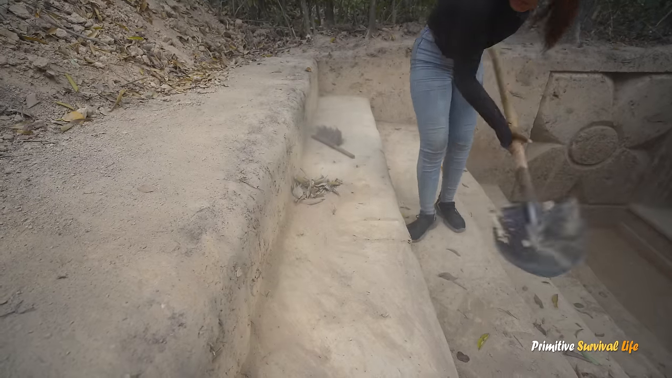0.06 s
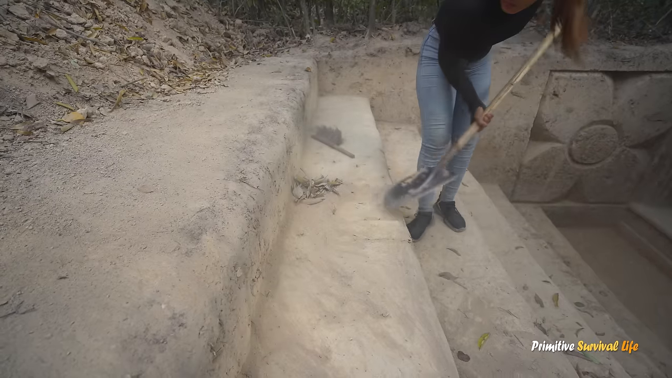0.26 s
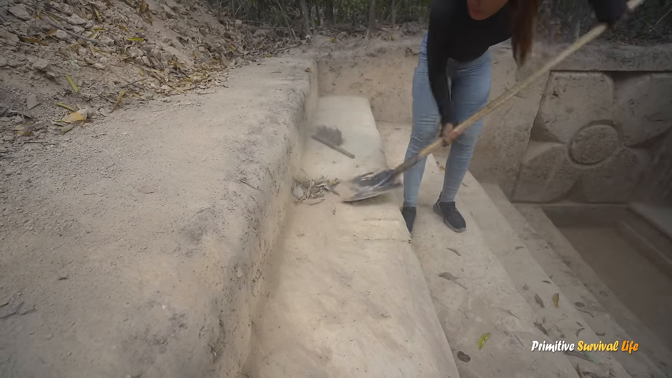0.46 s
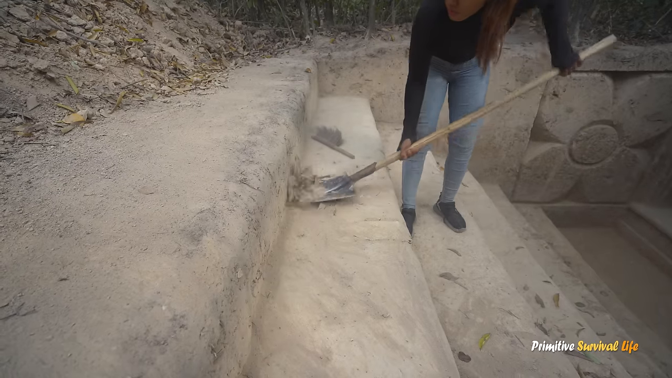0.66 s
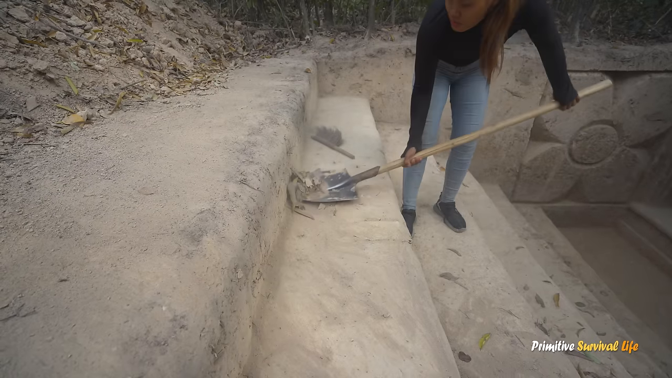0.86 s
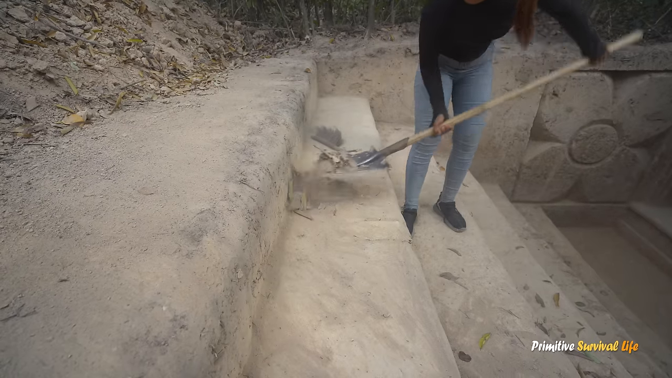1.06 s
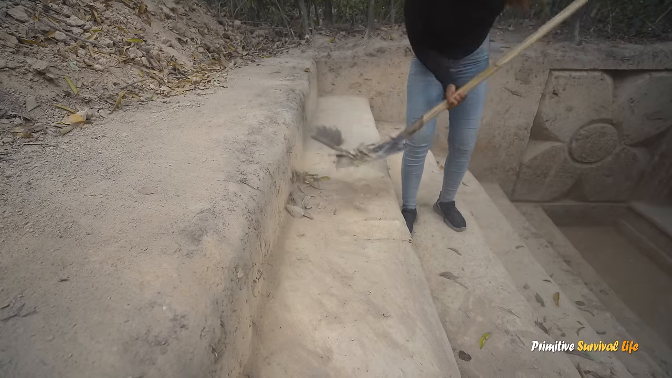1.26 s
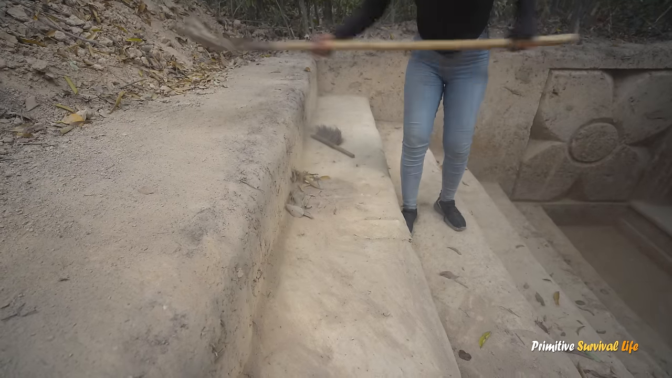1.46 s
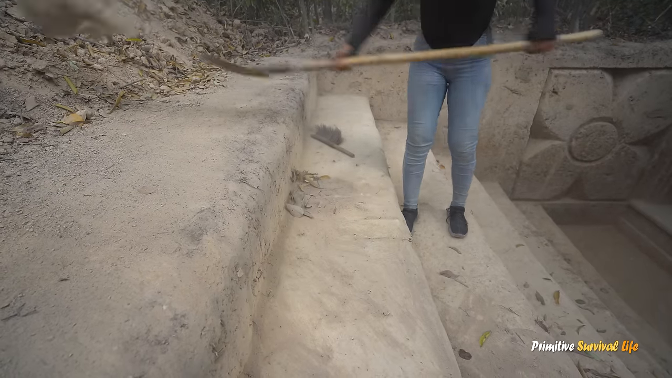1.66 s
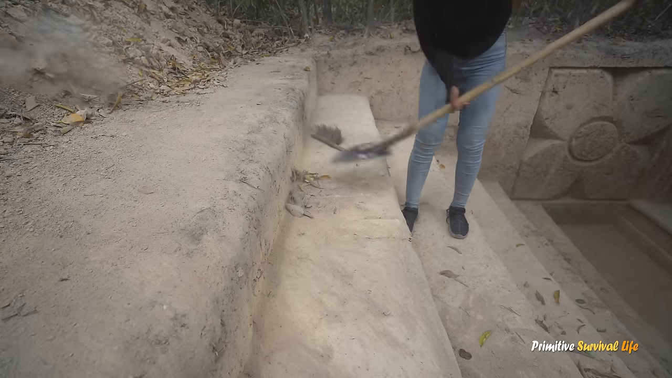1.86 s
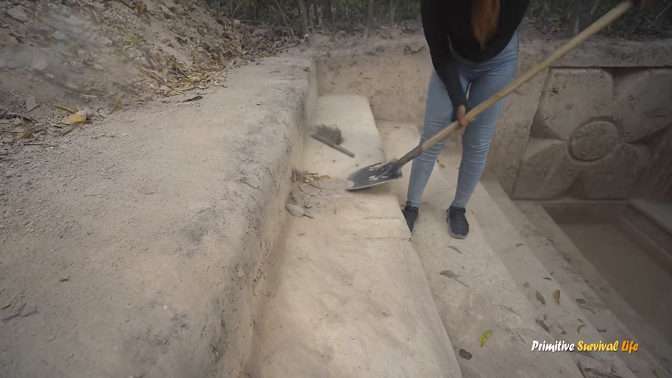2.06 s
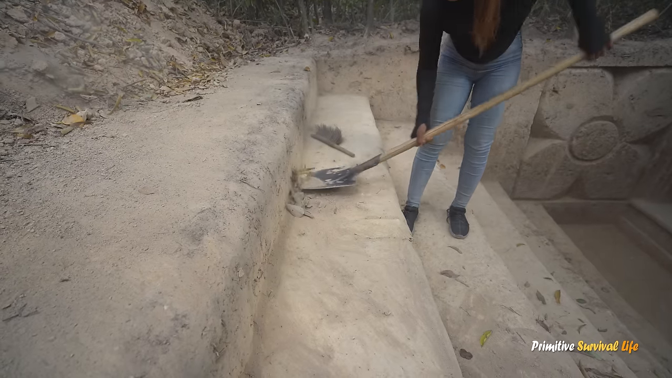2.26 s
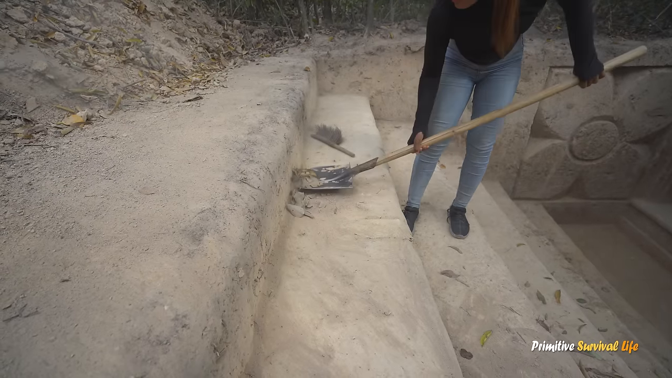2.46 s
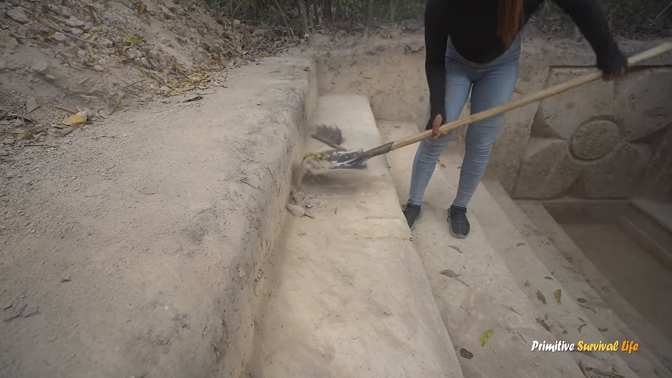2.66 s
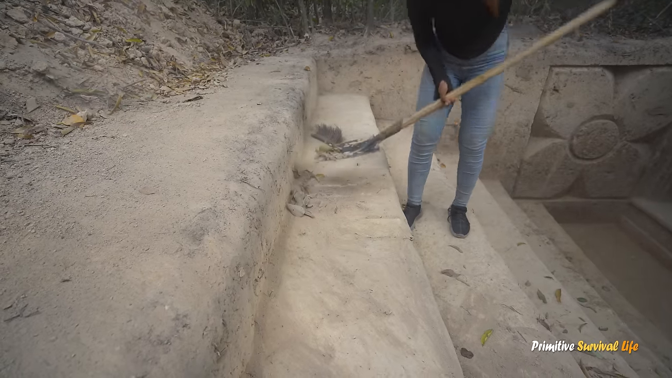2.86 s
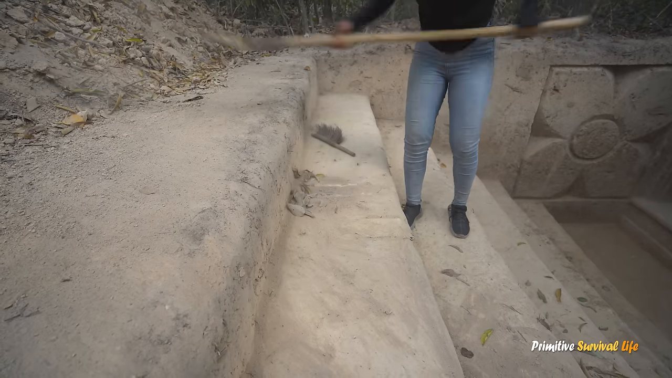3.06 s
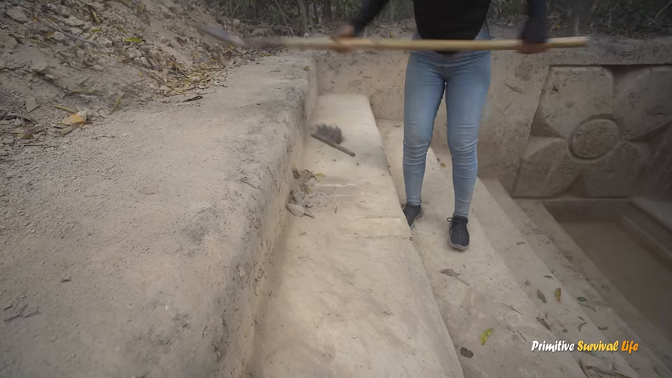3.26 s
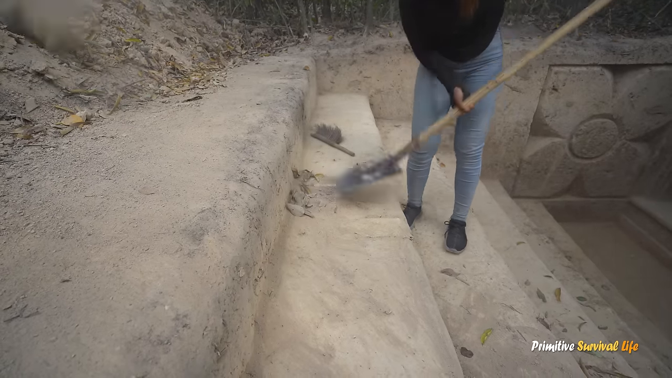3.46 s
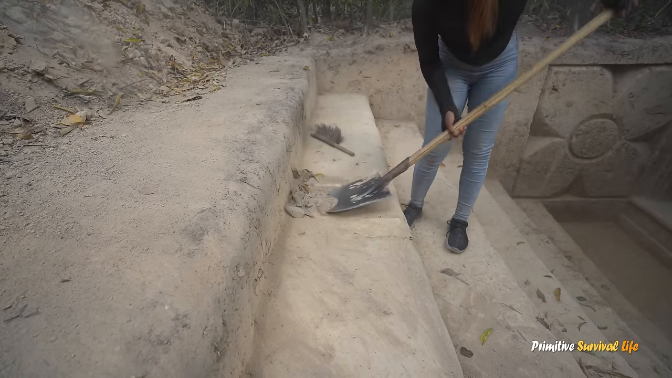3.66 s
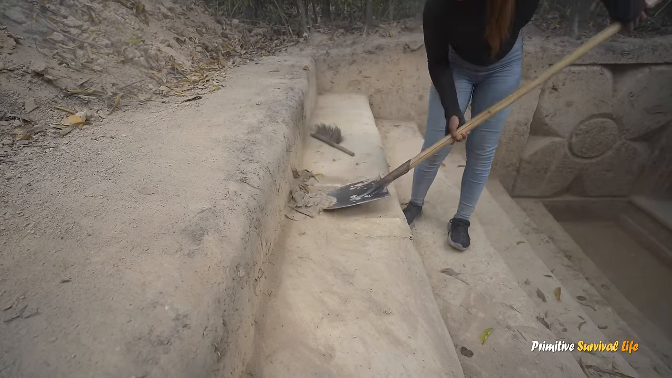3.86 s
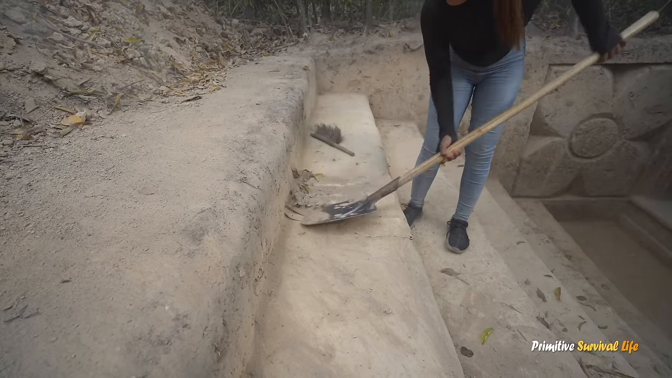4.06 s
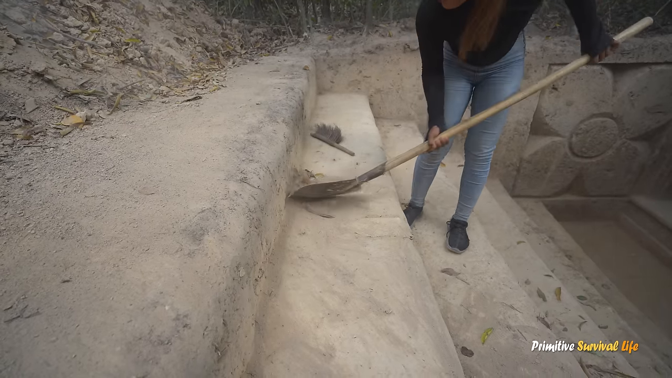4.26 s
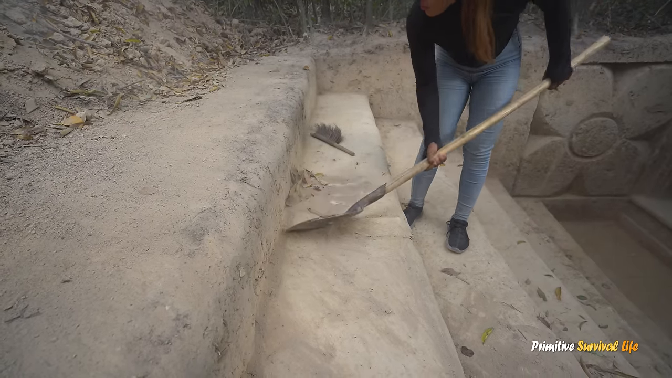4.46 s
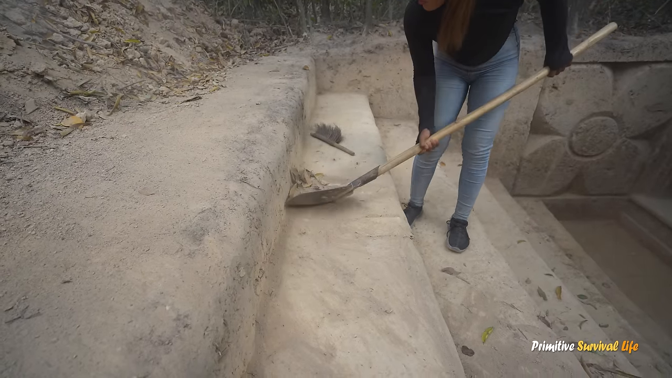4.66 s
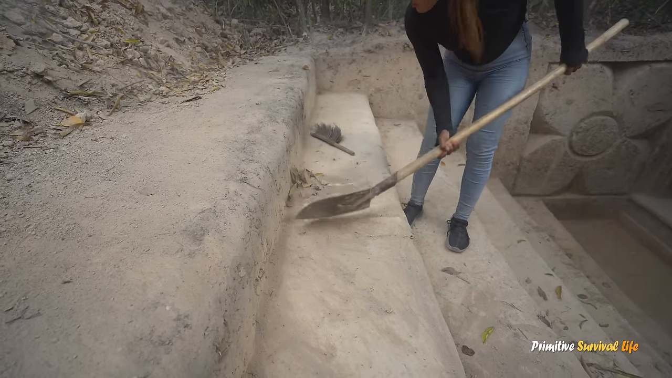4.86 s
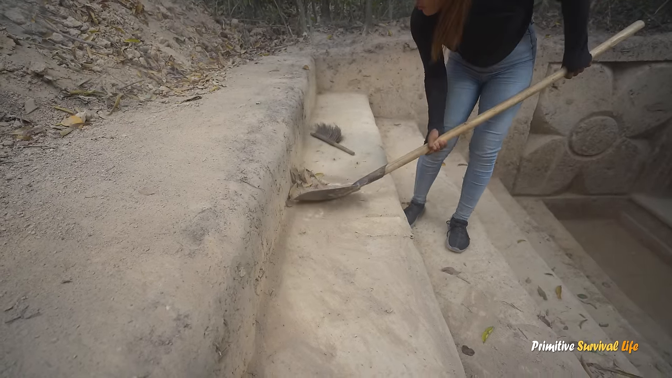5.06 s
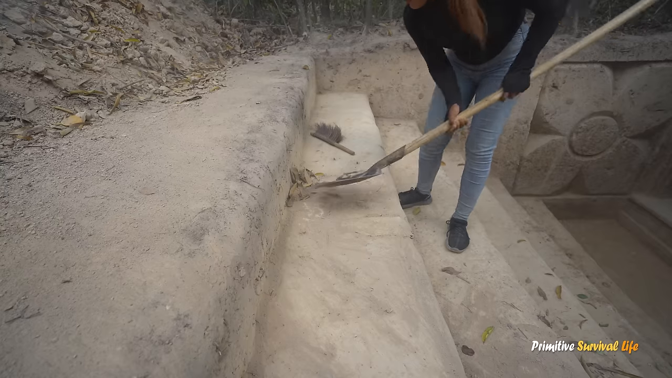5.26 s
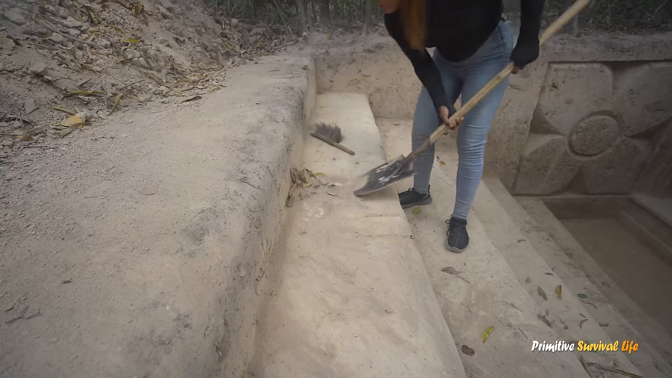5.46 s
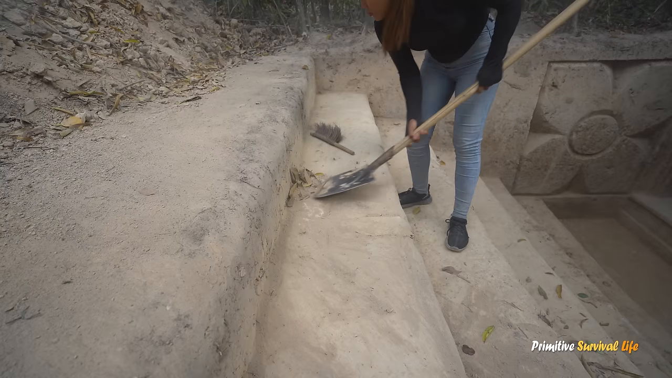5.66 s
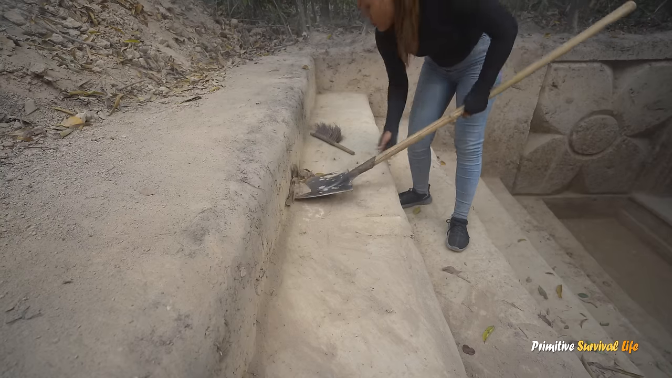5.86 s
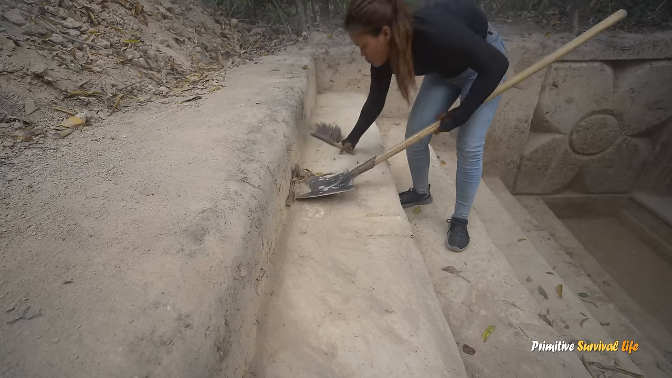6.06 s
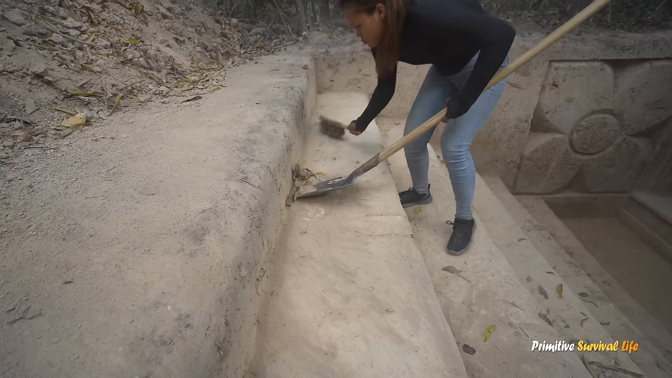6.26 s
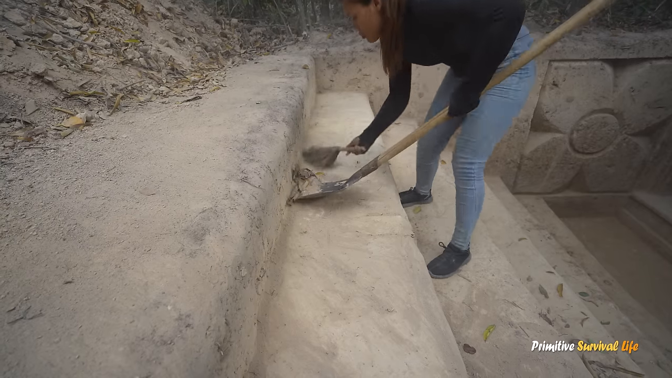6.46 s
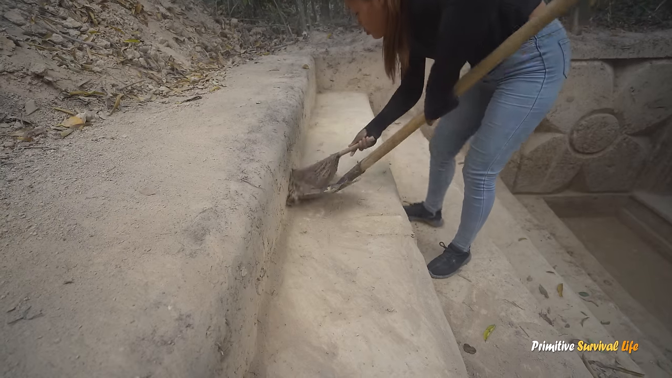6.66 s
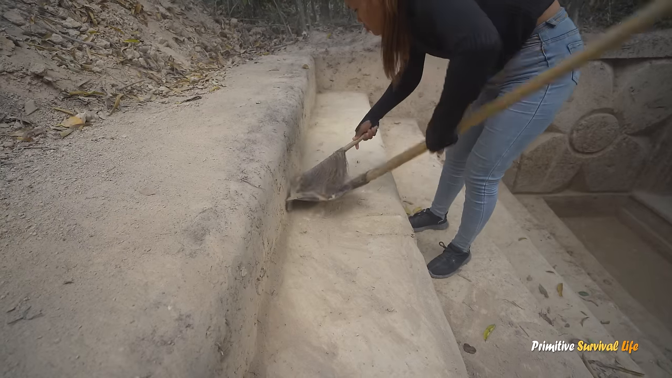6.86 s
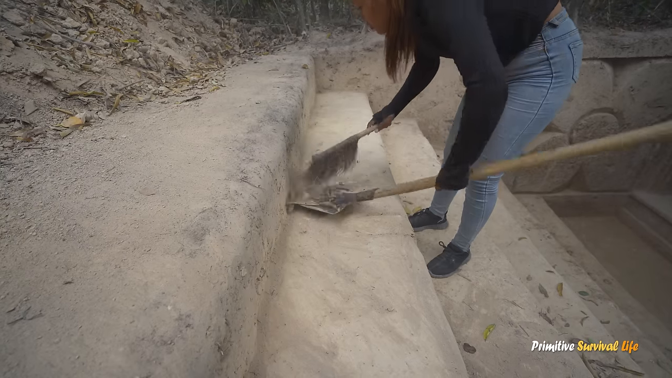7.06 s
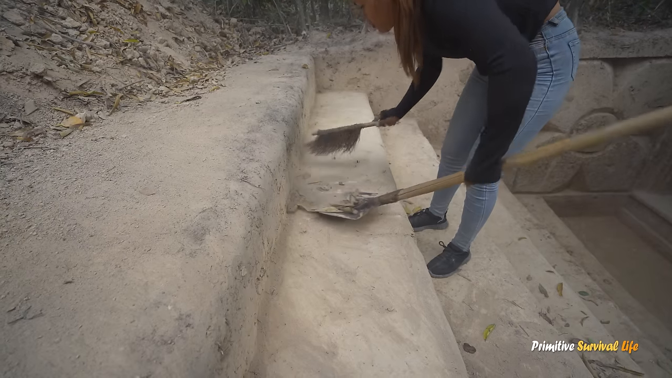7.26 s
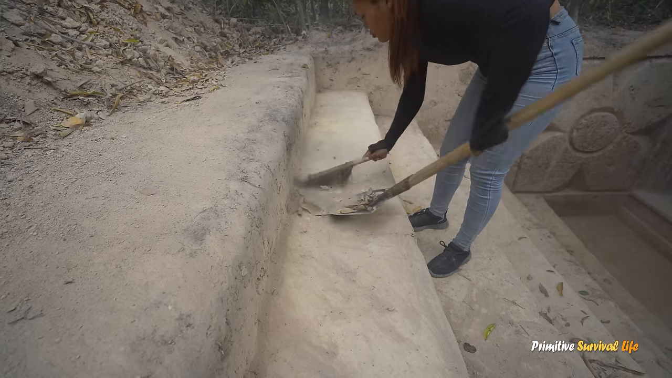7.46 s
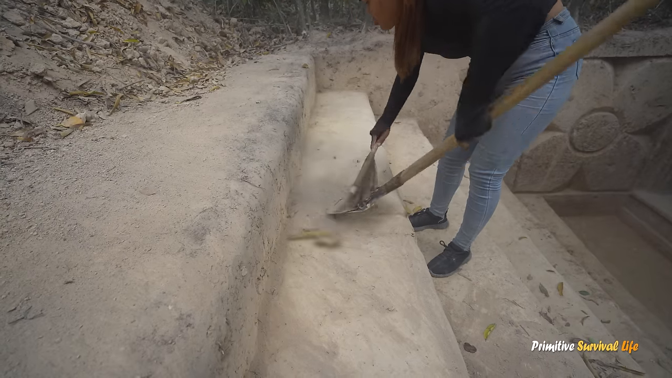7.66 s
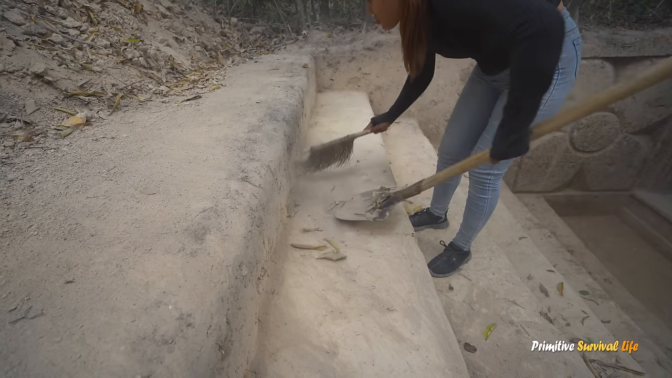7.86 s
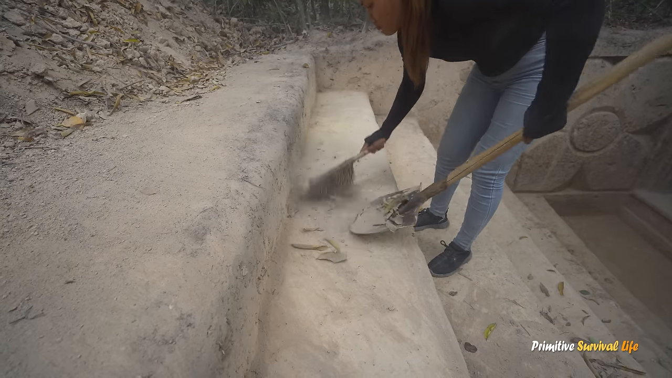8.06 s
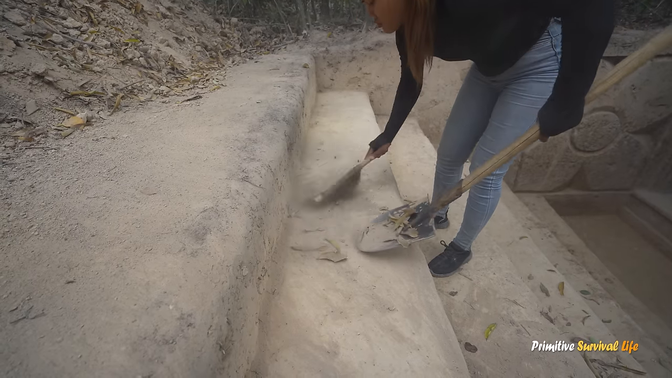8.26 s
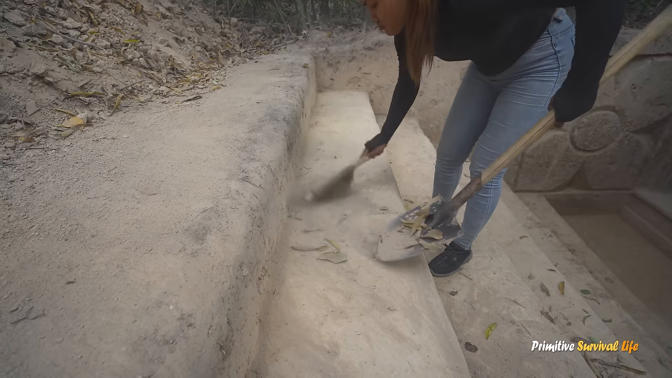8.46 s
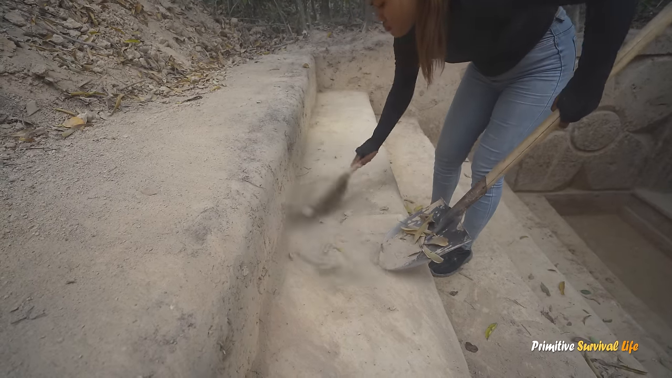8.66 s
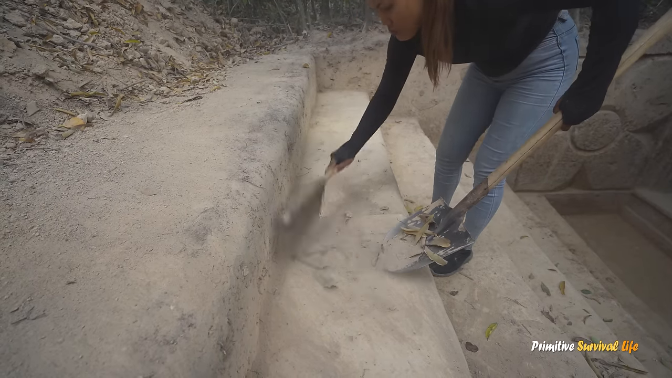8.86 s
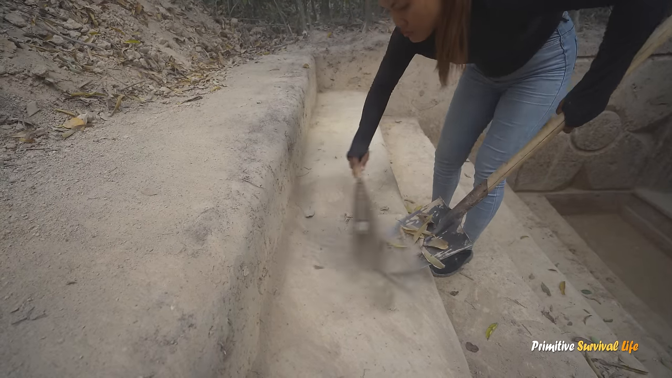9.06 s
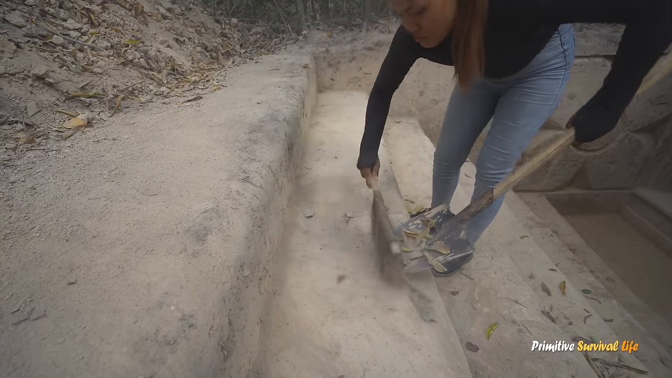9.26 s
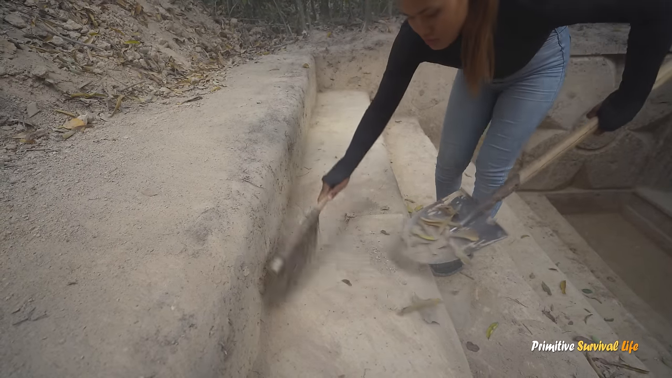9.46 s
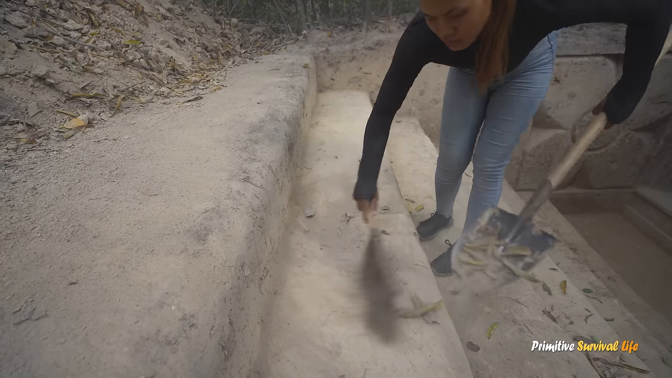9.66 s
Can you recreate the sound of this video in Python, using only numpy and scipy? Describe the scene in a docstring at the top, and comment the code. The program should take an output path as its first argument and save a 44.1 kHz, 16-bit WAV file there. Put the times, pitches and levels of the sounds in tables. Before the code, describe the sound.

A steel shovel scrapes and knocks on dry earth outdoors, then a hand brush sweeps grit and leaves onto the blade.

```python
"""Loose dirt slides in quiet forest air, then a steel shovel scrapes and knocks on dry earthen steps.
It throws its load aside, and a hand brush sweeps leaves onto the blade. Streams of tiny impacts make
grit hiss and leaves rustle; rubbing and blows ring the blade and handle at their modes while the
packed earth rumbles underneath. Clods and twigs snap. All is heard from a couple of metres away."""
import sys
import numpy as np
from scipy import signal
from scipy.fft import rfft, irfft, next_fast_len
from scipy.io import wavfile
from scipy.ndimage import uniform_filter1d

SR = 44100
rng = np.random.default_rng(int(sys.argv[2]) if len(sys.argv) > 2 else 0)


def unload_audio(sound):
    """Save the sound as a 16-bit wav file, at the path given as the first command line argument."""
    columns = np.transpose(np.atleast_2d(sound))
    # keep every value between -1 and 1, then stretch to whole-number steps
    steps = np.round(np.clip(columns, -1, 1) * 32767)
    wavfile.write(sys.argv[1], SR, steps.astype(np.int16))


N = 428652


def undb(db):
    return 10 ** (np.asarray(db) / 20)


def unit_rms(x):
    return x / np.sqrt(np.mean(x ** 2))


def butter(x, order, hz, kind):
    return signal.sosfilt(signal.butter(order, hz, kind, fs=SR, output="sos"), x)


def colour(x, points):
    """EQ through (Hz, dB) points."""
    hz, db = np.transpose(points)
    size = next_fast_len(N)
    bins_hz = np.maximum(np.arange(size // 2 + 1) * SR / size, 1)
    gain = undb(np.interp(np.log(bins_hz), np.log(hz), db))
    return irfft(rfft(x, size) * gain, size)[..., :N]


def band(x, hz, width_hz):
    """Two-pole resonance, gain 1 at the centre."""
    return signal.lfilter(*signal.iirpeak(hz, hz / width_hz, SR), x)


def flicker(depth_db, per_s):
    """A gain that glides between random levels."""
    hold = int(SR / per_s)
    steps = np.repeat(rng.standard_normal(N // hold + 1), hold)
    return undb(1.2 * depth_db * uniform_filter1d(steps, hold)[:N])


def grains(per_s, spread_db, patchy_db, patches_per_s):
    """Tiny uneven impacts in patches; mid and side, as the contact is wide."""
    hit = rng.random(N) < per_s / SR
    size = undb(spread_db * np.minimum(rng.exponential(size=N), 4)) * rng.standard_normal((2, N))
    return unit_rms(hit * size * flicker(patchy_db, patches_per_s))


def bursts(times, levels_db, t60):
    """One short dying burst of noise per event, mid and side."""
    out, age = np.zeros((2, N + SR)), np.arange(SR // 10) / SR
    envelope = np.minimum(age / 0.00063, 1) * 1000 ** (-age / t60)
    for start, db in zip(times, levels_db):
        out[:, int(start * SR):][:, :len(age)] += undb(db) * envelope * rng.standard_normal((2, len(age)))
    return out[:, :N]


# Tone of the background bed. Each row: frequency in Hz, gain in dB.
AIR_EQ = [(26, -45), (34, 4), (44, 4.5), (55, 2.5), (180, 2), (545, -7), (820, -6.5), (1200, -9.5),
          (2200, -11), (4000, -12.5), (14000, -18), (16000, -28)]

def forest_air(level_db=-55.5):
    """Forest air and microphone hiss: centred bass, wide treble."""
    mid, side = colour(rng.standard_normal((2, N)), AIR_EQ) * flicker(1.5, 3.2)
    side = butter(side, 2, 330, "high")
    return undb(level_db) * np.array([mid + side, mid - side]) / np.std(mid)


def swells(t, rows, bodies_db, sand_db, roundness):
    """Power of grit, leaves, blade, handle, earth and sand in loose motion.
    bodies_db trims blade, handle and earth; sand_db is against the blade.
    Roundness 1 is pointed, 3 flat-topped."""
    power = 0
    for loudest, rise, fall, grit_db, leaf_db, body_db in rows:
        away = abs(t - loudest) / np.where(t < loudest, rise, fall)
        blade_db, handle_db, earth_db = body_db + np.array(bodies_db)
        layers_db = np.array([0, leaf_db, blade_db, handle_db, earth_db, blade_db + sand_db])
        power = power + undb(grit_db - 10 * away ** roundness + layers_db[:, None]) ** 2
    return power


# Swells of loose dirt. Each row: loudest moment, 10 dB rise time and 10 dB fall time in seconds,
# grit level in dB, then leaves and ringing bodies in dB against the grit.
DIRT_SLIDES = [(.14, .2, 0.24, -53, -8, -7), (.785, 0.035, 0.065, -51, 8.5, 7),
               (1.13, 0.26, 0.16, -52, 2, 4), (1.49, 0.083, 0.075, -49, 0.5, -2.5),
               (1.58, 0.044, .06, -45.5, -5, -1), (1.829, 0.048, 0.1, -37, -2.5, -2.5),
               (1.97, .06, .1, -50, -6, 1), (2.75, .1, 0.17, -52, -10, 2.5),
               (3.11, 0.075, 0.078, -43.5, -3, -8), (3.25, 0.12, .15, -56.5, -2, 6.5),
               (3.545, 0.022, 0.063, -31.5, -4.5, -2.5), (3.97, 0.2, 0.14, -63, 6, 14),
               (4.35, 0.22, 0.14, -49, -4, -1), (4.45, 0.031, 0.019, -49, -2, 13),
               (5.315, 0.01, .025, -60.5, -3, 19.5), (5.35, 0.027, 0.041, -52.5, -5, 7),
               (5.9, 0.12, 0.085, -57, -2, 6.5)]

def dirt_slides(t):
    """Loose dirt slides off the blade, lands or is shuffled."""
    return swells(t, DIRT_SLIDES, bodies_db=[-5.5, -12, -16], sand_db=-1, roundness=1.52)


def shimmer(x, split_hz):
    """Coarse and fine grains come and go on their own, so two bands flicker apart."""
    coarse = butter(x, 2, split_hz, "low")
    return unit_rms(coarse * flicker(1.5, 40) + (x - coarse) * flicker(1.5, 40))


def pebble_crunch(grit, count=30):
    """Pebbles and leaf shards ring for milliseconds: narrow bands that flare at random."""
    centres = np.geomspace(3000, 14000, count) * (1 + 0.019 * rng.standard_normal(count))
    return unit_rms(sum(band(grit * flicker(6, 45), hz, width_hz=160) for hz in centres))


# Bright tone of dry grit. Each row: frequency in Hz, gain in dB.
GRIT_EQ = [(1500, -11), (4000, -10), (8000, -3.5), (12000, -4.5), (16000, -4.5)]

def grit_hiss():
    """Dense fine grains hiss, with crunching pebbles and catching stones among them."""
    fine = colour(grains(14000, 1.4, 2.1, 110), GRIT_EQ)
    return undb(-2.5) * shimmer(fine, 10000) + undb(-6.5) * pebble_crunch(fine) + undb(-10) * stones()


def stones(per_s=45, t60=0.022):
    """Small stones catch now and then in sudden bursts of noise."""
    hit = (rng.random(N) < per_s / SR) * undb(3.3 * rng.standard_normal(N))
    fading = signal.lfilter([1], [1, -1000 ** (-1 / (t60 * SR))], hit)
    return unit_rms(colour(fading * rng.standard_normal((2, N)), GRIT_EQ))


# Papery tone of leaves. Each row: frequency in Hz, gain in dB.
LEAF_EQ = [(1500, -25), (3000, -8.5), (4700, -4.5), (6500, -7), (10000, -18)]

def leaf_rustle():
    """Leaves crackle in sparser, more uneven grains than grit."""
    return undb(0.5) * shimmer(colour(grains(7000, 2.65, 2.94, 160), LEAF_EQ), 5500)


# Dull tone of sand. Each row: frequency in Hz, gain in dB.
SAND_EQ = [(800, -15), (1400, -2.5), (2400, 2.5), (3600, -6.5), (6000, -40)]

def sand_rasp():
    """Rubbed sand gives a patchy midrange rasp."""
    return undb(-3) * unit_rms(colour(grains(3000, 2.8, 3.3, 150), SAND_EQ))


# The contact point favours one mode and it sings out.
# Each row: start and end in seconds, rough pitch of the mode in Hz, boost in dB.
SINGING_MODES = [(.54, .64, 285, 7), (.405, .51, 2870, 11), (.43, .5, 4600, 14), (.405, .46, 4200, 10),
                 (3.61, 3.64, 3480, 8), (.44, .6, 2210, 8), (2.033, 2.36, 2210, 6), (2.13, 2.25, 3800, 5),
                 (3.61, 3.79, 2210, 6), (3.61, 3.66, 2870, 6), (4.21, 4.27, 1450, 10), (5.0, 5.05, 2870, 5),
                 (5.04, 5.09, 2035, 7), (5.04, 5.1, 2210, 6), (5.53, 5.84, 2135, 10)]

def ring(rub, blow, modes, resting_t60_share=0.52):
    """Rubbing reaches each mode through a wandering contact point; the earth damps a resting blade."""
    free = blade_freedom()
    pitches = np.array(modes)[:, 0]
    favour = np.ones((len(modes), N))
    for start, end, hz, boost_db in SINGING_MODES:
        if pitches.min() < 1.1 * hz < 1.2 * pitches.max():  # within this body's range
            nearest = np.argmin(abs(pitches - hz))
            favour[nearest, int(start * SR):int(end * SR)] = undb(boost_db)
    out = 0
    for k, (hz, resting_db, free_db, t60) in enumerate(modes):
        force = (-1) ** k * favour[k] * (rub * flicker(3, 18) + blow)
        for share, db, decay_s in ((1 - free, resting_db, resting_t60_share * t60), (free, free_db, t60)):
            pole = np.exp(2j * np.pi * hz / SR - np.log(1000) / (decay_s * SR))
            mode = signal.lfilter([0, pole.imag], [1, -2 * pole.real, abs(pole) ** 2], share * force)
            out = out + undb(db) * mode
    return out


# Modes of the steel. Each row: pitch in Hz, gain in dB with the blade resting,
# gain in dB with it hanging free, free t60 in seconds.
BLADE_MODES = [(1440, 0.5, -8, 0.035), (1726, -14.5, -5, 0.068), (1840, -21.5, -4, 0.029),
               (2037, -11, -2, 0.2), (2138, -5, -13, 0.11), (2203, 0.5, -6.5, 0.09), (2330, -20, -9, 0.1),
               (2590, -8, -7, 0.037), (2855, -4.5, -6, 0.086), (3146, 0, -2.5, 0.038),
               (3493, -1, -17, 0.039), (3796, 1.5, -2.5, 0.041), (4157, -7.5, -10, 0.088),
               (4555, -8, -24, 0.088), (5360, -10.5, -11, 0.08)]

def steel_blade(drive, strike):
    """Grains and blows excite the steel, which rings on after the stroke stops."""
    rub = drive * grains(4000, 2.3, 2.16, 120)
    steel = undb(-31) * ring(rub, strike, BLADE_MODES)
    return steel * np.array([[1], [0.6]])  # a small source, so less side


# Modes of the wood. Each row: as for the blade.
HANDLE_MODES = [(714, 2.8, -1, 0.035), (858.5, 3.5, 2, 0.045), (1020, 0.5, 4, 0.026)]

def wooden_handle(drive, thud):
    """The handle answers rubbing and thuds with a short woody ring."""
    rub = undb(-21) * drive * grains(2500, 2.8, 3.2, 50)
    return ring(rub, undb(-25.5) * thud, HANDLE_MODES)


# Low modes of the step. Each row: as for the blade.
EARTH_MODES = [(110, -26, -22, 0.069), (172.6, -12.5, -9, 0.11), (214.6, -6.5, -0.5, 0.077),
               (284, -1.5, -8.5, 0.078), (400, 2.5, -5.5, 0.077), (488.5, -1.5, -7.5, 0.061)]

def packed_earth(drive, thud):
    """The ground rumbles under rubbing and thumps under knocks and bumps."""
    rub = undb(-22.5) * drive * grains(2500, 2.0, 4.2, 35)
    return ring(rub, undb(-27) * thud + undb(-22.5) * soft_bumps(), EARTH_MODES)


# Shovel strokes. Each row: touch, hardest push and lift in seconds; grit level in dB at those three
# moments; leaves, blade, handle and earth in dB against the grit at the hardest push; bite into the
# earth from 0 to 1; sand in dB against the blade; freedom from 0 (resting) to 1 (hanging).
SHOVEL_STROKES = [(0.406, 0.454, .48, -38.5, -40, -42, 2.5, 4, -16.5, -8.5, .2, -13, 0.13),
                  (0.491, 0.576, 0.73, -37.5, -39, -44.5, 1, 6, 3, 7, 0.62, -3.5, .17),
                  (0.812, .925, 0.93, -48, -44.5, -40.5, 0.5, -0.5, -2.5, 3.5, 0.45, 2, 0.16),
                  (2.03, 2.315, 2.383, -43, -39, -47, -3.5, 4.5, -1.5, -2.5, 0.45, -9, .14),
                  (2.421, 2.44, 2.52, -52, -48, -55.5, 0.5, 0.5, -7.5, -6, 0.53, 2, .12),
                  (2.57, 2.607, 2.677, -57, -43.5, -56.5, 4, 4.5, 2, -4, .6, -0.5, .12),
                  (3.609, 3.714, 3.76, -44.5, -40.5, -41.5, -0.5, 7, -5, -3, 0.5, -11.5, 0.17),
                  (4.097, 4.17, 4.2, -43.5, -38, -42.5, 0, 11, -5, -6.5, .4, -5.5, 0.34),
                  (4.21, 4.24, 4.245, -42.5, -36, -40, 1, 9.5, 9, -1, .5, -3, 0.31),
                  (4.472, 4.607, 4.773, -47.5, -32.5, -48, 1.5, 11.5, 0, -7, 0.52, -3.5, 0.54),
                  (4.979, 5.078, 5.11, -34.5, -33.5, -35.5, -2.5, 14.5, -3.5, -3, 0.5, -5, 0.74),
                  (5.528, 5.532, 5.615, -35, -44.5, -70, 6.5, 20, 17.5, 7.5, 0.34, -9, 0.39),
                  (5.615, 5.647, 5.814, -41.5, -38, -40.5, 0.5, 7.5, -8, -4.5, 0.19, -14, 0.25)]

def shovel_scrapes(t, roundness=1.3):
    """Power of the six layers as the blade touches, digs in, eases and lifts off."""
    dig_in_db, ease_db = [1.5, -3, -14, -11.5], [-3, -4, -5, -2]  # leaves, blade, handle, earth
    power = 0
    for touch, hardest, lift, touch_db, hard_db, lift_db, *offsets_db, bite, sand_db, _ in SHOVEL_STROKES:
        early = np.clip((hardest - t) / (hardest - touch), 0, 1) ** roundness
        late = np.clip((t - hardest) / (lift - hardest), 0, 1) ** roundness
        since_lift = np.maximum(t - lift, 0)
        grit_db = hard_db + early * (touch_db - hard_db) + late * (lift_db - hard_db)
        # the hiss stops fast, a little dirt trickles on
        grit_db += np.maximum(-507 * since_lift, -22 - 87 * since_lift)
        leaf_db, blade_db, handle_db, earth_db = [
            db + bite * (dig * early + ease * late)
            for db, dig, ease in zip(offsets_db, dig_in_db, ease_db)]
        layers_db = np.array([np.zeros_like(t), leaf_db, blade_db, handle_db, earth_db, blade_db + sand_db])
        power = power + (t >= touch) * undb(grit_db + layers_db) ** 2
    return power


def blade_freedom(brush_from_s=6.2, as_pan=0.37):
    """How freely the blade hangs: one value per stroke, then held still as a pan for the brush."""
    freedom = [row[-1] for row in SHOVEL_STROKES] + [as_pan]
    changes_s = [row[0] for row in SHOVEL_STROKES[1:]] + [brush_from_s]
    edges = [0] + [int(s * SR) for s in changes_s] + [N]
    return np.repeat(freedom, np.diff(edges))


def blows(times, levels_db, t60, tap_db):
    """A sharp first contact followed by a crunch."""
    out = bursts(times, levels_db, t60)
    out[:, (times * SR).astype(int) + 8] += undb(levels_db + tap_db)
    return out


# Knocks on the steel blade: it strikes the earth, and later the brush taps against it.
# Each row: start in seconds, level in dB, low thud in dB against that level.
BLADE_KNOCKS = [(0.407, -21, -8), (0.4895, -23.5, -19), (0.825, -21, -5.5), (0.854, -20.5, -6),
                (0.9143, -29.5, 6.5), (2.0369, -15.5, -17.5), (2.282, -15.5, -5), (2.3441, -22.5, 0),
                (2.4858, -23, -6), (2.582, -25.5, -6.5), (2.605, -22, -2.5), (3.6146, -16, -20),
                (3.7, -23, -20), (4.1054, -27.5, -12), (4.238, -20, -5), (4.4748, -18.5, -15),
                (4.6272, -9, -13), (4.721, -13, -14), (4.9836, -15.5, -11.5), (5.0464, -17, -14),
                (5.5308, -8, -13.5), (5.6232, -28, -9), (5.793, -23, -8), (6.3081, -28.5, -11),
                (6.6017, -25, -10), (7.275, -26.5, -15), (7.3041, -42, -22), (7.3172, -21.5, -12),
                (7.4096, -27, -12.5), (7.43, -25.5, -15.5), (8.0138, -31, -4.5), (8.2305, -28, -14),
                (8.959, -26, -13)]

def blade_knocks():
    """Each knock sprays grit, strikes the steel and sends a thud into handle and ground."""
    times, level_db, thud_db = np.transpose(BLADE_KNOCKS)
    spray = undb(-10.5) * colour(bursts(times, level_db, t60=0.025), GRIT_EQ)
    strike = blows(times, level_db, t60=0.027, tap_db=14.8)
    thud = blows(times, level_db + thud_db, t60=0.024, tap_db=20)
    return spray, strike, thud


# Soft weight on the earth. Each row: start in seconds, level in dB.
SOFT_BUMPS = [(1.79, -35), (6.345, -46), (8.025, -36.5), (8.57, -36), (9.065, -39), (0.736, -48)]

def soft_bumps():
    """The force of a load landing or a foot set down."""
    return bursts(*np.transpose(SOFT_BUMPS), t60=0.1)


# Clods and twigs. Each row: start in seconds, level in dB, centre frequency in Hz.
TWIG_SNAPS = [(0.925, -26.5, 10000), (0.992, -30, 4300), (1.13, -33, 5520), (1.168, -30.5, 2380),
              (1.385, -43, 9000), (1.637, -37, 800), (1.889, -26.5, 937), (2.659, -29, 7540),
              (3.027, -36.5, 2850), (3.199, -29, 1090), (3.239, -29.5, 4450), (3.369, -38, 2170),
              (3.397, -40, 3050), (3.484, -40, 10000), (3.523, -30, 2870), (3.864, -39, 3050),
              (5.352, -30.5, 2820), (6.41, -37, 700), (6.46, -38, 800), (6.52, -43, 800),
              (6.695, -30, 7350), (6.818, -22, 5500), (7.21, -36.5, 7200), (7.223, -30, 2540),
              (8.27, -31, 5710), (8.294, -24.5, 5800), (8.327, -26.5, 5000), (8.436, -32, 3320),
              (8.542, -22.5, 8610), (8.591, -20.5, 8590), (8.884, -33, 4700), (9.225, -34, 4280)]

def twig_snaps(t60=0.018):
    """A clod or twig breaks with a brief wide-band click."""
    out, age = np.zeros((2, N + SR)), np.arange(SR // 20) / SR
    for start, db, hz in TWIG_SNAPS:
        click = rng.standard_normal((2, len(age))) * 1000 ** (-age / t60)
        out[:, int(start * SR):][:, :len(age)] += undb(db + 5) * band(click, hz, 0.62 * hz)
    return out[:, :N]


# Strokes of the hand brush. Each row: as for the dirt slides.
BRUSH_STROKES = [(6.22, .05, 0.051, -59, 1, 16), (6.32, 0.058, 0.095, -46, -4, 7.5),
                 (6.55, .17, 0.3, -39, -9, -1.5), (6.699, 0.082, 0.056, -41.5, 2, 9),
                 (6.82, 0.039, 0.056, -35, 1.5, 3.5), (7.02, 0.08, 0.056, -40.5, 4, 5.5),
                 (7.17, 0.17, 0.084, -51.5, -1.5, 6), (7.3, 0.074, 0.064, -55, 3, 12),
                 (7.5, 0.068, 0.17, -39.5, -6, -1.5), (7.64, 0.059, 0.074, -38.5, 3.5, 7.5),
                 (7.75, 0.13, 0.058, -38, -3.5, -1), (7.87, 0.078, 0.15, -54, 4.5, 7),
                 (8.05, 0.12, 0.19, -45, -4.5, 2.5), (8.24, 0.012, 0.03, -41.5, -8, -1),
                 (8.289, .04, 0.078, -40, 0.5, -2), (8.39, 0.15, 0.2, -43.5, -9, -12),
                 (8.57, 0.046, 0.057, -38, -3.5, -4), (8.67, 0.068, 0.13, -36.5, 0.5, 2.5),
                 (8.78, 0.13, 0.062, -37.5, -7.5, -13), (8.89, 0.051, .04, -48, 5, 5),
                 (8.965, .009, 0.038, -32.5, 0, -1.5), (9.035, 0.055, 0.066, -29.5, 4.5, -3.5),
                 (9.3, 0.048, 0.049, -40.5, 5, 0.5), (9.345, 0.036, 0.017, -41.5, 7, 0.5),
                 (9.42, 0.077, 0.094, -52, -0.5, 0), (9.7, 0.21, 0.11, -46.5, -5.5, -4.5)]

def brush_sweeps(t):
    """The brush pushes leaves and grit onto the blade."""
    return swells(t, BRUSH_STROKES, bodies_db=[-8, -16.5, -20.5], sand_db=0.5, roundness=1.42)


# Hollows in the tone. Each row: centre in Hz, width in Hz, depth from 0 to 1.
REFLECTION_DIPS = [(564, 120, 0.24), (1182, 130, 0.44)]

def near_reflections(x):
    """Reflections near the microphone cancel narrow bands."""
    for hz, width_hz, depth in REFLECTION_DIPS:
        x = x - depth * band(x, hz, width_hz)
    return x


# Stereo width. Each row: frequency in Hz, side gain in dB.
WIDTH_EQ = [(200, -67), (600, -31), (1400, -10.5), (3000, -6.5), (6500, -5), (15000, -1)]
# Where the work sits. Each row: time in seconds, left minus right in dB.
PAN_PATH = [(0.0, -9), (0.21, -4.5), (1.54, 1), (1.7, 8), (2.11, -3), (2.73, -1.5), (3.25, 2), (3.84, -4.5),
            (4.17, -1.5), (5.23, -2), (5.41, -4), (6.71, -1.5), (8.04, -3), (8.25, -1.5), (9.72, -4)]

def place_in_stereo(mid, side):
    """Width grows with frequency; only the treble is directional at the microphones."""
    side = colour(side, WIDTH_EQ)
    wide = np.array([mid + side, mid - side])
    treble = butter(wide, 1, 700, "high")
    pan_db = np.interp(np.arange(N) / SR, *np.transpose(PAN_PATH))
    return wide + treble * (undb(np.array([pan_db, -pan_db]) / 2) - 1)


def scene():
    """Slides, scrapes and sweeps ride the faders of six layers; knocks and snaps land on top."""
    t = np.arange(0, N, 32) / SR  # coarse clock for the faders
    power = dirt_slides(t) + shovel_scrapes(t) + brush_sweeps(t)
    faders = [np.interp(np.arange(N) / SR, t, np.sqrt(row)) for row in power]
    grit, leaves, blade, handle, earth, sand = faders
    debris = grit * grit_hiss() + leaves * leaf_rustle() + sand * sand_rasp()
    spray, strike, thud = blade_knocks()
    bodies = steel_blade(blade, strike) + wooden_handle(handle, thud) + packed_earth(earth, thud)
    work = debris + spray + bodies + twig_snaps()
    work = butter(work, 3, 85, "high")  # earth radiates little deep bass
    return place_in_stereo(*near_reflections(work)) + forest_air()


def record(dry):
    """The top octave is duller on the left, brighter on the right, and ends in a steep low-pass."""
    top = butter(dry, 2, 10000, "high")
    heard = dry + np.array([[-0.15], [0.15]]) * top
    return signal.sosfilt(signal.ellip(10, 0.2, 80, 15900, fs=SR, output="sos"), heard)


dry = scene()
out = record(dry)
unload_audio(out)
```